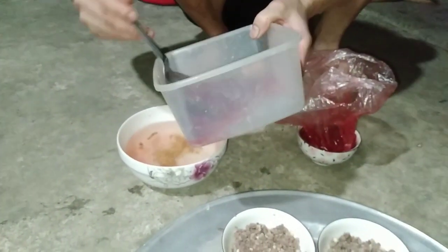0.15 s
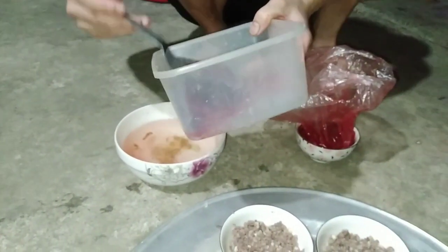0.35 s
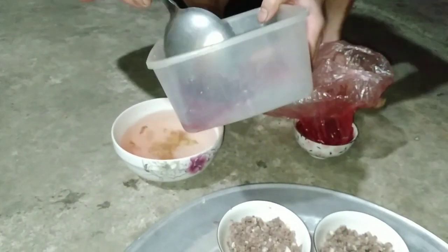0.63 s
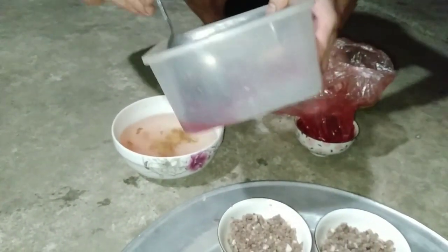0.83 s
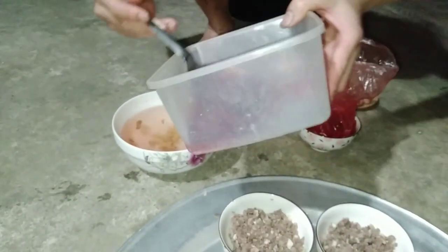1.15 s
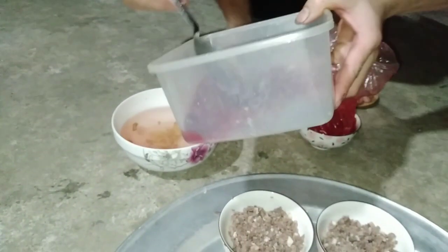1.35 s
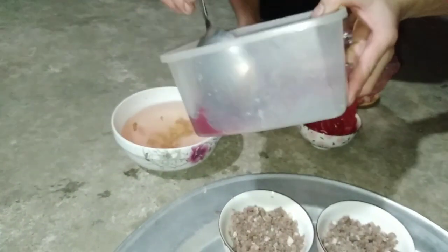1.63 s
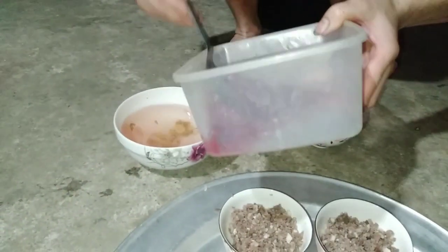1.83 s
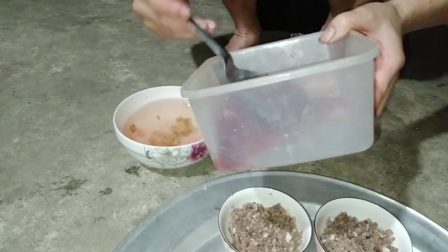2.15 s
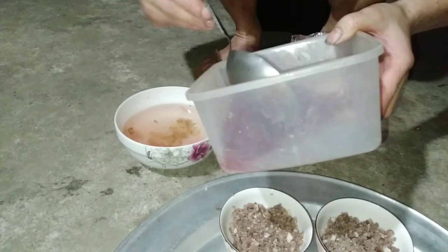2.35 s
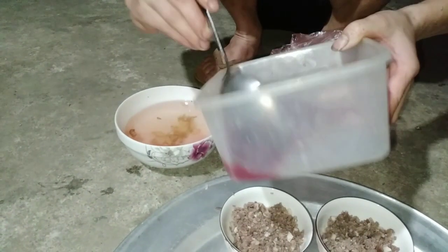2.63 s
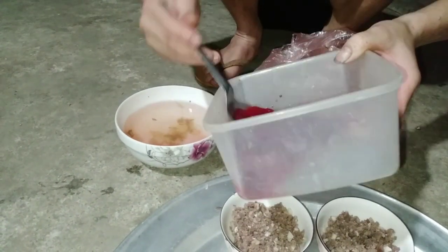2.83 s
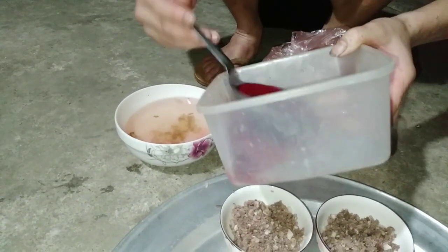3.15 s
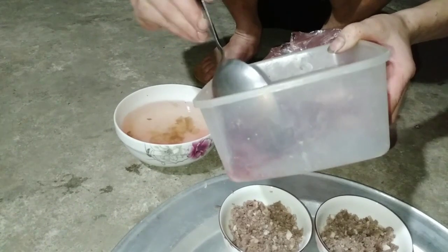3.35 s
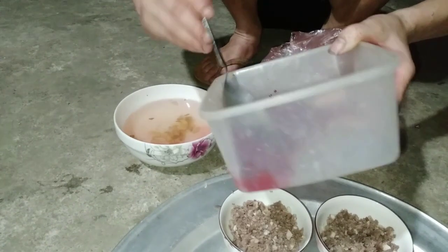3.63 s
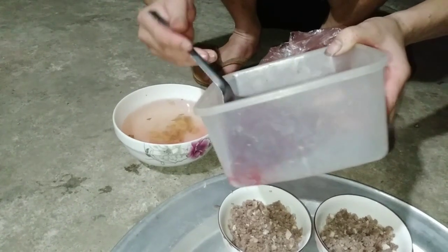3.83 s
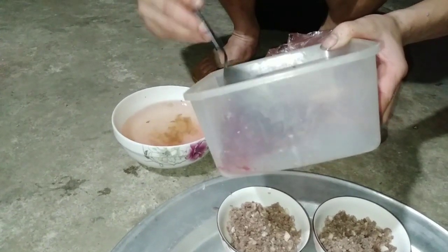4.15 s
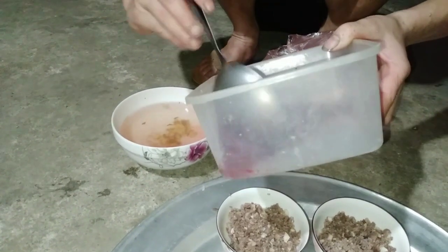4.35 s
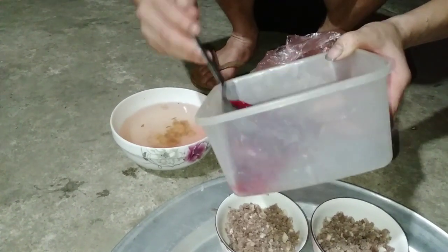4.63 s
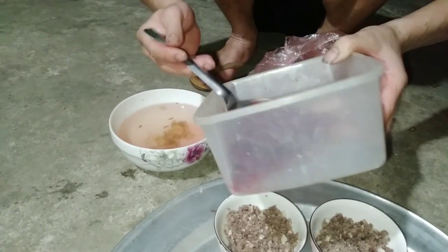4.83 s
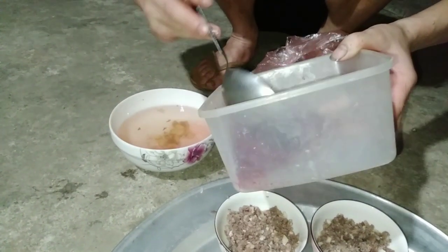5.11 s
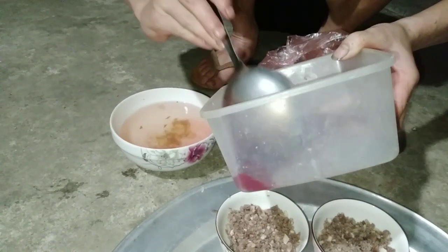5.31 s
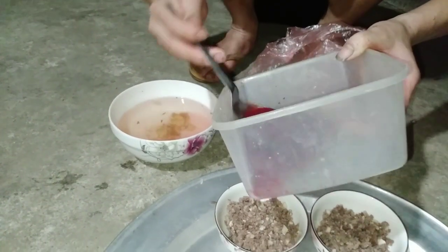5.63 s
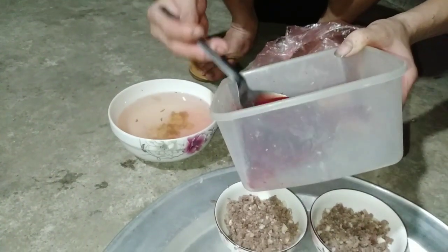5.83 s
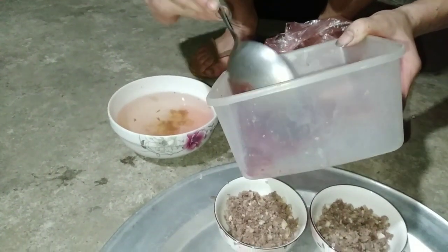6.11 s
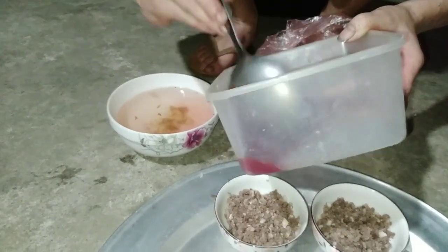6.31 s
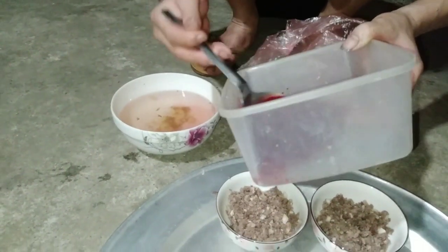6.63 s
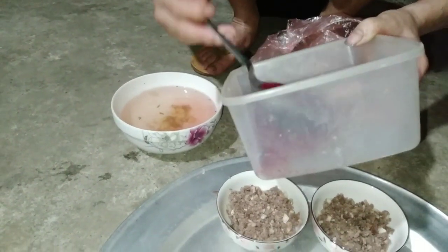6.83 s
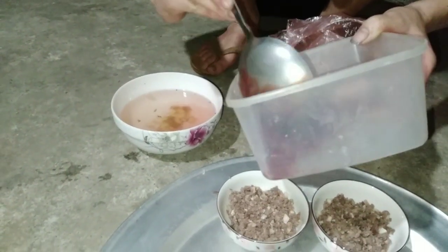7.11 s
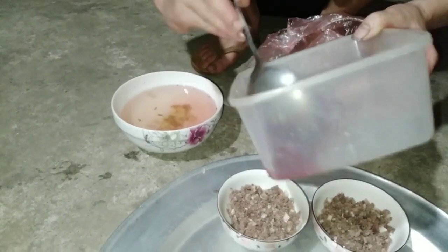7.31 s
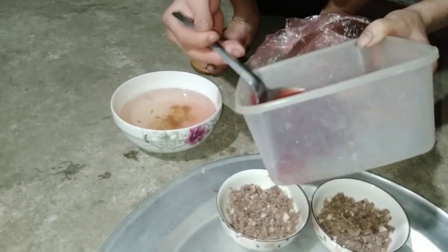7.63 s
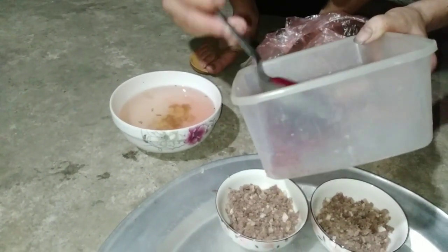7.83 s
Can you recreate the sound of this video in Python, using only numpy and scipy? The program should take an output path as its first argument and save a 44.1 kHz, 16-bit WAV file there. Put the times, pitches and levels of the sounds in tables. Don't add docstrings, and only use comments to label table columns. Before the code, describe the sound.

Outdoors at night, a spoon works in a plastic tub: clacking, hollow thumps in a loose regular rhythm, one much softer midway. Gritty scraping, small rebounds, quick double taps and faint squeaks fill the gaps, with an occasional low flex of the tub bottom. Stereo, close microphone, short hard-walled reverberation. A near high cricket and a fainter faster chorus continue over low air noise and hiss.

```python
import sys
import numpy as np
from scipy import signal
from scipy.fft import rfft, irfft, next_fast_len
from scipy.io import wavfile
from scipy.ndimage import uniform_filter1d, map_coordinates

SR = 44100
rng = np.random.default_rng(int(sys.argv[2]) if len(sys.argv) > 2 else 0)


def field_ratio(decibels):
    return 10 ** (np.asarray(decibels, dtype=float) / 20)


def pcm_store(signal):
    levels = np.round(np.clip(np.atleast_2d(signal), -1, 1) * 32767)
    wavfile.write(sys.argv[1], SR, levels.astype(np.int16).T)


N = 351464


def unit(x):
    return x / np.sqrt(np.mean(x ** 2) + 1e-20)


def along(points, hz):
    f, v = np.transpose(points)
    return np.interp(np.log(hz + 1), np.log(f + 1), v)


def curves(rows):
    s, *cols = np.transpose(rows)
    return [np.interp(np.arange(N) / SR, s, c) for c in cols]


def wobble(rate_hz):
    knots = rng.standard_normal(int(N * rate_hz / SR) + 4)
    return map_coordinates(knots, [np.arange(N) * rate_hz / SR])


def noise():
    return rng.standard_normal((2, N))


def filtered(x, response):
    m = next_fast_len(N + 8192)
    return irfft(rfft(x, m) * response(np.fft.rfftfreq(m, 1 / SR)), m)[..., :N]


def peak(centre_hz, width_hz):
    return lambda f: 1j * f * width_hz / (centre_hz ** 2 - f * f + 1j * f * width_hz)


def blend(pair, alike):
    turn = lambda hz: np.arccos(np.clip(along(alike, hz), -1, 1)) / 2
    mid, side = filtered(pair, lambda hz: np.array([np.cos(turn(hz)), np.sin(turn(hz))]))
    return np.array([mid + side, mid - side])


def streaky(x, depth_db):
    z = signal.stft(x, nperseg=512)[2]
    field = uniform_filter1d(rng.standard_normal(z.shape[1:]), size=2, axis=0)
    field = uniform_filter1d(field, size=8, axis=1)
    return signal.istft(z * field_ratio(depth_db * unit(field)), nperseg=512)[1][:, :N]


# t/s, click peak level/dB, thump re click/dB, thud re click/dB, click f/Hz
BLOWS = [
    (0.0084, -24, 4.5, -11.5, 1560),
    (0.8786, -18, 7, -11, 2230),
    (1.7794, -17, 7, -12, 2880),
    (2.6802, -12.5, 6.5, -16.5, 2000),
    (3.59, -16.5, 6.5, -8, 2280),
    (4.5151, -30.5, 15, 3, 1300),
    (5.445, -18, 2.5, -11.5, 2520),
    (5.46, -27.5, 9.5, -4, 1431),
    (6.3987, -15, 6.5, -8, 1910),
    (7.3571, -17, 8.5, -11.5, 1370),
]
# t/s, click peak level/dB, thump re click/dB, click f/Hz, thump f/Hz
TAPS = [(0.632, -23.5, 0, 2220, 790), (0.7207, -23, -10, 1690, 780), (0.729, -33.5, 13, 2290, 645),
        (1.519, -24, 0, 1760, 743), (1.5449, -23, -3, 1710, 592), (2.4447, -26, 5, 2380, 700),
        (2.5383, -25, 4, 1700, 627), (3.2818, -23.5, -2, 3360, 648), (3.4512, -23, 1, 2150, 652),
        (3.48, -32, 2.5, 1360, 615), (4.219, -20.5, 0.5, 3040, 655), (4.3089, -23, 3.5, 3180, 671),
        (4.3314, -27, -4.5, 1340, 810), (5.1379, -29, -1.5, 3340, 630), (5.3095, -21.5, -1.5, 1760, 617),
        (6.144, -30.5, 6.5, 3280, 673), (6.2736, -18, -3, 3340, 673), (6.305, -26.5, 3.5, 3280, 627),
        (7.081, -31.5, 8, 1600, 655), (7.2221, -21.5, 3, 3410, 635), (7.2518, -24, -4, 1330, 620)]
# t/s, click peak level/dB, thump re click/dB, click f/Hz
TICKS = [(0.2603, -36.5, -34, 1950), (0.434, -29.5, -31, 2380), (0.4659, -38, -12, 2080),
         (0.5919, -30, -30, 2030), (0.985, -27.5, -2, 2590), (1.4741, -27, -31, 2160),
         (1.6531, -35.5, -25, 1990), (1.7025, -45.5, 10, 2920), (1.884, -38, 6, 2700),
         (1.924, -38.5, -6, 1470), (2.1924, -40, -0.5, 2050), (2.2303, -40.5, 2.5, 1570),
         (2.2829, -44, -16, 2250), (2.7775, -20.5, -2, 3100), (3.1606, -29, -34, 3200),
         (3.372, -43, -26, 1460), (3.7205, -24, -2.5, 2990), (4.043, -35.5, -5, 1910),
         (4.357, -38, -7, 3000), (5.342, -31, -10, 3220), (6.17, -41, -12, 3120),
         (4.6385, -24.5, 1.5, 3350), (4.986, -44, -4, 1980), (5.288, -52, 12, 1500),
         (5.6094, -36, -1.5, 3160), (5.9399, -37.5, -16, 3560), (6.897, -38.5, -6, 1540),
         (7.889, -33.5, -7, 1500)]
# t/s, thud level/dB
BUMPS = [
    (0.5935, -49.5),
    (1.0659, -35),
    (1.086, -51),
    (1.134, -45),
    (1.4772, -46.5),
    (5.098, -31),
    (5.1217, -48),
    (5.138, -51),
    (5.611, -51),
    (7.8457, -60),
]


def contacts():
    blow_hollow_hz, tick_hollow_hz = 655, 642
    blow_spot_db, tap_spot_db, tick_spot_db = -2, 0, 3.5
    thud_re_thump_db = -15.5
    bump_click_db, bump_thump_db, bump_click_hz = -26, 11, 1480
    bump_ring_db = -7
    rows = [(*row, blow_hollow_hz, blow_spot_db) for row in BLOWS]
    rows += [(s, db, thump, thump + thud_re_thump_db, hz, hollow, tap_spot_db)
             for s, db, thump, hz, hollow in TAPS]
    rows += [(s, db, thump, thump + thud_re_thump_db, hz, tick_hollow_hz, tick_spot_db)
             for s, db, thump, hz in TICKS]
    rows += [(s, db + bump_click_db, bump_thump_db, bump_ring_db - bump_click_db,
              bump_click_hz, tick_hollow_hz, blow_spot_db) for s, db in BUMPS]
    return rows


def ring(modes, loose, t):
    total = 0
    for hz, db, t60_s in modes:
        decay = field_ratio(db + rng.normal(0, 3.75) - 60 * t / t60_s)
        total = total + decay * np.sin(2 * np.pi * hz * rng.normal(1, loose) * t)
    return total


# f/Hz, level/dB, T60/s
SHELL = [(646.1, -10, 0.095), (697, -15, 0.11), (756.5, -21, 0.14), (914, -19.5, 0.044), (587, -18, 0.034),
         (833, -15, 0.0428), (1190, -41, 0.066)]
# f/Hz, level/dB, T60/s
FLOOR = [(175, -34, 0.14), (177.9, 3, 0.17), (223.4, 4.5, 0.092), (273.7, 7, 0.11), (339, -6, 0.19),
         (404, -15.5, 0.21)]


def hollow_body(t, db, thump_db, thud_db, thump_hz):
    u = t / 0.0026
    thump = u * u * np.exp(2 - 2 * u) * -np.sin(2 * np.pi * thump_hz * t)
    thump = thump + ring(SHELL, 0.013, t) * (1 - np.exp(-u))
    thud = ring(FLOOR, 0.025, t)
    return field_ratio(db + thump_db) * thump + field_ratio(db + thud_db - 8.5) * thud


# f/Hz, level/dB, T60/s
RIBS = [(1028, -9, 0.025), (1560, -3, 0.025), (2380, -6, 0.024), (2880, -5.5, 0.021), (3240, 1.5, 0.013),
        (3860, 5, 0.008)]


def metal_click(t, db, click_hz, spot_db):
    stray = lambda spread: rng.normal(0, spread, (2, 1))
    crack = rng.standard_normal((2, len(t))) * (field_ratio(-60 * t / 0.032) + 0.64 * field_ratio(-60 * t / 0.056))
    crack_low_hz = click_hz * .45 * field_ratio(.8 * spot_db)
    crack = signal.lfilter(*signal.butter(3, crack_low_hz, 'high', fs=SR), crack)
    ribs = 0
    for hz, level_db, t60_s in RIBS + [(click_hz, spot_db, .016)]:
        near_db = -(6.5 + 2.5 * spot_db) * abs(np.log2(hz / click_hz))
        decay = field_ratio(level_db + near_db + stray(1.35) - 60 * t / t60_s)
        ribs = ribs + decay * np.sin(2 * np.pi * hz * (1 + stray(0.0074)) * t + stray(0.72))
    onset = 1 - np.exp(-t / 0.00041)
    return field_ratio(db - 5.5 - 0.061 * spot_db) * (0.99 * field_ratio(-.7 * spot_db) * crack + ribs) * onset


# f/Hz, level/dB
CLICK = [(150, 9.5), (900, 9.5), (1500, 2.5), (3000, 1), (4500, -7.5), (7000, -17.5), (11000, -25.5),
         (16000, -40)]


def knocks():
    t = np.arange(SR // 5) / SR
    thin_hz = 114
    low, sharp = np.zeros(N + SR), np.zeros((2, N + SR))
    for s, db, thump_db, thud_db, click_hz, thump_hz, spot_db in contacts():
        i = round(s * SR)
        low[i:i + len(t)] += hollow_body(t, db, thump_db, thud_db, thump_hz)
        sharp[:, i:i + len(t)] += metal_click(t, db, click_hz, spot_db)
    body = filtered(low[:N], lambda hz: (1j * hz / (thin_hz + 1j * hz)) ** 2)
    return body + filtered(sharp[:, :N], lambda hz: field_ratio(along(CLICK, hz)))


def flex():
    rest_hz, start_share, sag_s, re_thud_db, t60_s = 166.7, 0.71, 0.0071, 0.5, .19
    out, t = np.zeros(N + SR), np.arange(SR // 4) / SR
    turns = rest_hz * (t + start_share * sag_s * (1 - np.exp(-t / sag_s)))
    for s, db in BUMPS:
        i = round(s * SR)
        out[i:i + len(t)] += field_ratio(db + re_thud_db - 60 * t / t60_s) * np.sin(2 * np.pi * turns)
    return out[:N]


# t of most pressure/s, swell/s, ease/s, rasp level/dB, hiss re rasp/dB
STROKES = [(.3, 0.22, 0.47, -51.5, -19.5), (.6, 0.017, 0.16, -45, -36), (1.233, 0.12, 0.22, -39, -17.5),
           (1.55, 0.21, 0.22, -45.5, -19), (1.9, 0.41, 0.022, -50.5, -30), (2.227, 0.051, 0.26, -48.5, -15),
           (2.604, 0.19, 0.1, -43.5, -11.5), (2.8, 0.3, 0.24, -50, -19), (3.75, 0.44, 0.13, -51.5, -22.5),
           (3.898, 0.15, 0.36, -50, -14), (4.24, 0.15, 0.13, -43, -13), (4.468, 0.046, 0.073, -52, -17),
           (4.7, 0.35, 0.17, -56.5, -23), (4.96, 0.091, .03, -79, 12), (5.106, 0.032, .025, -48, -13),
           (5.212, .01, .012, -69, 6), (5.5, 0.28, 0.22, -50, -18), (6, 0.23, 0.12, -64, -12),
           (6.5, 0.41, .12, -50.5, -20.5), (6.79, .12, 0.15, -47, -11), (7.08, 0.19, 0.21, -47, -10),
           (7.45, 0.31, 0.13, -53, -20), (7.886, 0.027, 0.58, -51.5, -18.5)]
# t/s, ease/s, rasp level/dB, hiss re rasp/dB
DRAGS = [(0.019, 0.12, -45, -27), (.432, 0.38, -47.5, -16), (.766, 0.64, -53.5, -22),
         (.9, 0.074, -44.5, -24), (.984, 0.025, -47, -27), (1.657, 0.099, -44, -25),
         (3.02, 0.22, -60.5, -16), (3.161, 0.033, -66, 3), (3.29, 0.35, -57, -17), (4.305, 0.048, -42, -30),
         (4.985, 0.026, -47.5, -19), (5.12, 0.47, -61.5, -12), (5.788, .07, -74, -17)]


def pressure():
    catch_s = 0.0022
    slack_db, curvature, hiss_growth = 21.5, 1.51, 0.99
    t, power = np.arange(0, N + 64, 32) / SR, 0
    for s, swell_s, ease_s, db, hiss_db in STROKES + [(s, catch_s, *rest) for s, *rest in DRAGS]:
        loss_db = slack_db * abs((t - s) / np.where(t < s, swell_s, ease_s)) ** curvature
        power = power + field_ratio([db - loss_db, db + hiss_db - hiss_growth * loss_db]) ** 2
    return [np.interp(np.arange(N) / SR, t, gain) for gain in np.sqrt(power)]


# f/Hz, density level/dB per Hz
RASP = [(240, -67), (400, 2), (622, 1), (826, -2.5), (1110, -2), (1200, -3), (2120, 5), (6000, -6.5),
        (7800, -26), (13200, -120)]
# f/Hz, left-right likeness/1
RASP_ALIKE = [(200, 0.62), (700, .85), (1500, 0.15), (4000, 0.3)]
# f/Hz, density level/dB per Hz
HISS = [(3240, -8), (5500, -8), (7030, 2.5), (8410, -6.5), (10700, -10), (12000, -16), (16000, -19)]


def scrape():
    rasp_gain, hiss_gain = pressure()
    grit = lambda: noise() * field_ratio(2.5 * wobble(260) + .8 * wobble(30))
    rasp = blend(streaky(grit(), depth_db=2.5), RASP_ALIKE)
    rasp = unit(filtered(rasp, lambda hz: field_ratio(along(RASP, hz))))
    hiss = unit(filtered(streaky(grit(), depth_db=1), lambda hz: field_ratio(along(HISS, hz))))
    return rasp_gain * rasp + field_ratio(7.5) * hiss_gain * hiss


# t/s, length/s, f/Hz, level/dB
SQUEAKS = [(0.338, 0.024, 2457, -48), (0.481, 0.066, 2100, -56), (1.064, 0.025, 1480, -59),
           (1.13, .035, 1500, -57), (1.185, .02, 4350, -54), (1.225, .04, 2150, -49),
           (1.305, .025, 2800, -49), (2.473, 0.04, 4200, -49), (2.485, .04, 1900, -54),
           (2.52, .03, 3450, -51), (2.532, 0.09, 3700, -54), (2.565, 0.05, 3330, -46),
           (2.55, .06, 4400, -53), (2.56, 0.05, 1520, -54), (2.565, .04, 2550, -52),
           (2.636, 0.032, 2660, -48), (2.645, .025, 3750, -52), (2.655, 0.02, 4200, -48),
           (3.242, 0.021, 2350, -54.5), (3.385, .04, 1700, -58), (3.762, 0.035, 2370, -58),
           (3.808, 0.034, 1970, -57), (3.868, 0.069, 1960, -50), (3.87, .05, 1820, -55),
           (4.086, 0.035, 1950, -54), (4.13, 0.065, 1990, -50), (4.22, .04, 1520, -50),
           (4.985, 0.019, 2126, -49.5), (5.005, 0.02, 1560, -54), (5.106, .014, 400, -46),
           (5.118, .016, 520, -46), (5.52, .04, 2720, -53), (5.784, 0.021, 1806, -54.5),
           (5.96, .012, 1600, -59), (6.75, 0.08, 1870, -54), (6.955, 0.04, 2450, -55.5),
           (7.041, 0.08, 1495, -55), (7.735, .012, 1000, -59), (7.816, .008, 2050, -54),
           (7.842, 0.01, 3880, -52), (7.88, .025, 2420, -54), (7.912, .014, 1980, -52),
           (7.925, .045, 2400, -54)]


def squeaks():
    bend, waver = 0.032, 0.008
    out = np.zeros((2, N + SR))
    for s, length_s, hz, db in SQUEAKS:
        t = np.arange(round(length_s * SR)) / SR
        arch = np.sin(np.pi * t / length_s)
        z = rng.standard_normal((2, 2, SR // 4))
        rough = signal.lfilter([1], [1, -.99], z[0] + 1j * z[1])[:, -len(t):]
        wavering = np.sin(2 * np.pi * (rng.uniform(11.3, 38) * t + rng.random()))
        pitch = 1 + bend * (arch - .64) + waver * wavering
        carrier = np.exp(2j * np.pi * hz * np.cumsum(pitch) / SR)
        tone = np.real((1.2 + rough / np.std(rough)) * carrier)
        i = round(s * SR)
        out[:, i:i + len(t)] += field_ratio(db + 1.3) * tone * arch ** 0.2
    return out[:, :N]


# delay/s, level/dB
WALLS = [(.0166, -10), (.0215, -15), (.030, -20.5), (.037, -27.5), (.047, -24), (.066, -21.5)]
# f/Hz, T60/s
YARD = [(100, 0.56), (700, 0.37), (2500, 0.28), (10000, 0.26)]
# f/Hz, level re direct/dB
YARD_WET = [(150, -5), (700, -9.5), (1500, -7.5), (8000, -6.5)]
# f/Hz, left-right likeness/1
YARD_ALIKE = [(100, 0.89), (300, 0.85), (700, 0.62), (1500, 0.58), (9000, 0.81)]


def yard(x):
    echoes = lambda hz: sum(field_ratio(db) * np.exp(-2j * np.pi * hz * s) for s, db in WALLS)
    walls = lambda hz: echoes(hz) / (1 + 1j * hz / 2500)
    tail, step = np.zeros((2, N + SR)), SR // 4
    for i in range(0, N, step):
        hz, t, z = signal.stft(rng.standard_normal((2, SR // 2)), SR, nperseg=256)
        decay = field_ratio(-60 * t / along(YARD, hz)[:, None]) * (t > .008)
        answer = signal.istft(z * decay, SR, nperseg=256)[1]
        piece = signal.fftconvolve(x[:, i:i + step], answer / np.linalg.norm(answer[0]), axes=1)
        tail[:, i:i + piece.shape[1]] += piece
    diffuse = filtered(blend(tail[:, :N], YARD_ALIKE), lambda hz: field_ratio(along(YARD_WET, hz)))
    return x + filtered(x[::-1], walls) + diffuse


# t/s, swell lead/cycles, swell depth/1
CHIRR = [(0, -0.396, 0.95), (.9, -0.28, 0.5), (1.4, -0.29, 0.47), (2.4, -0.39, 0.64), (3.4, -0.157, 0.2),
         (3.9, -.1, 0.8), (4.5, 0.16, 0.6), (5.9, 0.114, 0.65), (6.9, 0.33, 0.2), (7.4, 0.15, 0.3),
         (8, 0.13, 0.64)]
# f/Hz, width/Hz, level/dB
WING = [(6400, 34, 3), (6860, 18, 10), (7200, 29, 1), (7400, 50, 11)]


def near_cricket():
    swells_hz, pulses_per_swell, pulse_depth = 9.4, 6, 0.24
    high_lead_cycles, high_db = 0.13, -14.5
    lead, depth = curves(CHIRR)
    turn = 2 * np.pi * (swells_hz * np.arange(N) / SR + lead)
    swell = lambda ahead: (1 + depth * np.cos(turn + 2 * np.pi * ahead)) ** 0.98
    wings = 1 + pulse_depth * np.cos(pulses_per_swell * turn + 1.4 * wobble(1.9))
    wings = wings * field_ratio(1.15 * wobble(16))
    favour = lambda hz: 1 + sum(field_ratio(db - 6) * abs(peak(c, w)(hz)) ** 2 for c, w, db in WING)
    song = lambda hz: favour(hz) * peak(6950, 850)(hz) ** 3 / (1 + (hz / 7750) ** 60)
    main = filtered(noise() * wings * swell(0), song)
    high = filtered(noise() * wings * swell(high_lead_cycles) ** 2, lambda hz: peak(7510, 380)(hz) ** 3)
    return field_ratio(-54.5) * (unit(main) + field_ratio(high_db) * unit(high))


# t/s, level/dB
FAR = [
    (0, -58),
    (.25, -54),
    (1.35, -58),
    (1.73, -67),
    (2.05, -54),
    (2.9, -59),
    (3.1, -54),
    (6.1, -52.5),
    (7, -49.5),
    (7.97, -53.5),
]


def far_crickets():
    pulse = field_ratio(0.94 * np.sin(2 * np.pi * np.cumsum(23 + 0.85 * wobble(4.2)) / SR))
    chorus = filtered(streaky(noise(), depth_db=2.4) * pulse, lambda hz: peak(4720, 700)(hz) ** 3)
    return field_ratio(curves(FAR)[0] - 7.5) * unit(chorus)


# f/Hz, density level/dB per Hz
NIGHT = [(20, -12), (100, -3.5), (200, -5), (350, -8), (700, -9), (1150, -52), (1600, -24.5), (2200, -14.5),
         (3600, -16), (5500, -20), (7600, -8.5), (8500, -44), (10500, -32.5), (16000, -54.5)]
# f/Hz, left-right likeness/1
NIGHT_ALIKE = [(60, 0.61), (180, 1), (330, -0.29), (600, 0.0051), (1650, -0.091), (4970, -0.18),
               (15000, -0.74)]


def night():
    stir_db, gust_db = -53.5, 3
    hiss = filtered(noise(), lambda hz: field_ratio(along(NIGHT, hz)) * (hz > 60))
    drone = filtered(rng.standard_normal(N), peak(292, 35))
    stir = filtered(noise(), lambda hz: peak(14, 40)(hz) * peak(25, 120)(hz))
    steady = field_ratio(-55) * unit(blend(hiss, NIGHT_ALIKE)) + field_ratio(-62) * unit(drone)
    return steady + field_ratio(stir_db + gust_db * wobble(3.22)) * unit(stir)


def scene():
    tub = knocks() + flex() + scrape() + squeaks()
    return yard(tub) + near_cricket() + far_crickets() + night()


def band_limit(x):
    return signal.sosfilt(signal.butter(12, 16470, fs=SR, output="sos"), x)


# f/Hz, left minus right level/dB
PORTS = [(100, 0.5), (700, 0.5), (2400, 7), (4500, 3.5), (6000, 7.5), (7000, 17), (8300, -4),
         (10500, -17.5), (14000, 7)]


def record(dry):
    top_hz, lag_s = 15830, .00015
    colour = lambda hz: field_ratio(np.outer([.5, -.5], along(PORTS, hz)))
    delay = lambda hz: np.exp(np.outer([-1j, 1j], np.pi * hz * lag_s))
    heard = filtered(dry, lambda hz: colour(hz) * delay(hz) * (hz < top_hz))
    sensor = field_ratio(-79.0) * filtered(noise(), lambda hz: (hz > 11200) * (hz < top_hz))
    return band_limit(heard + sensor)


dry = scene()
out = record(dry)
pcm_store(out)
```